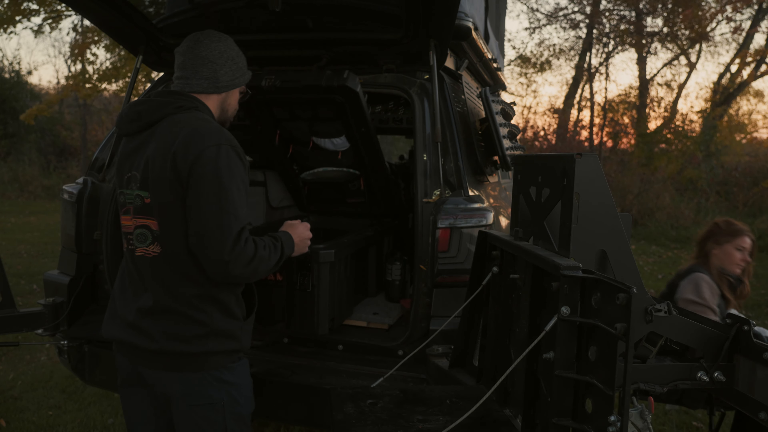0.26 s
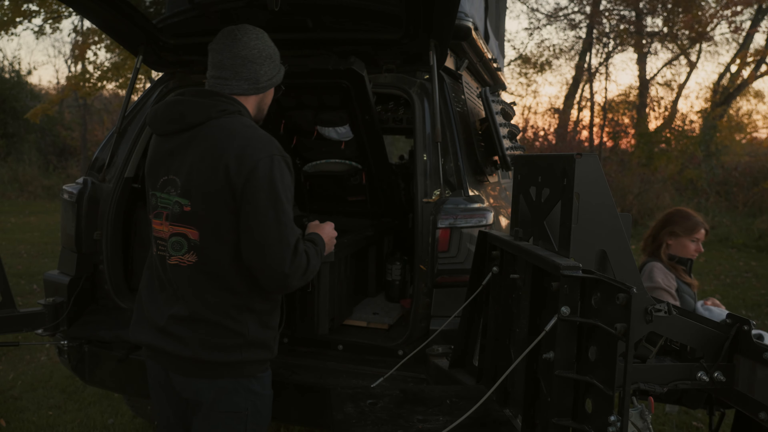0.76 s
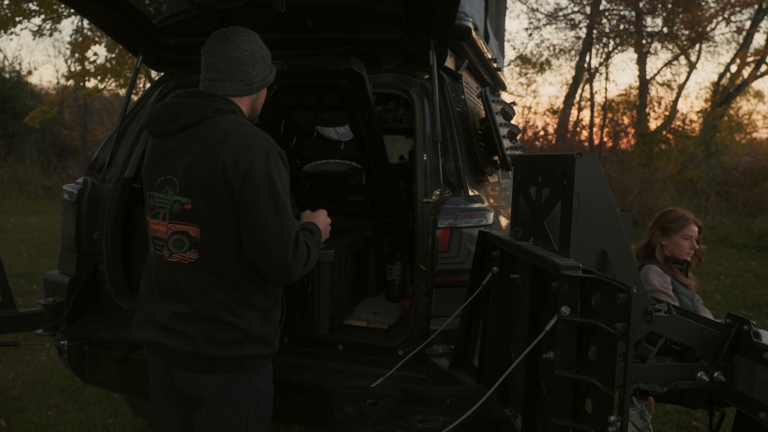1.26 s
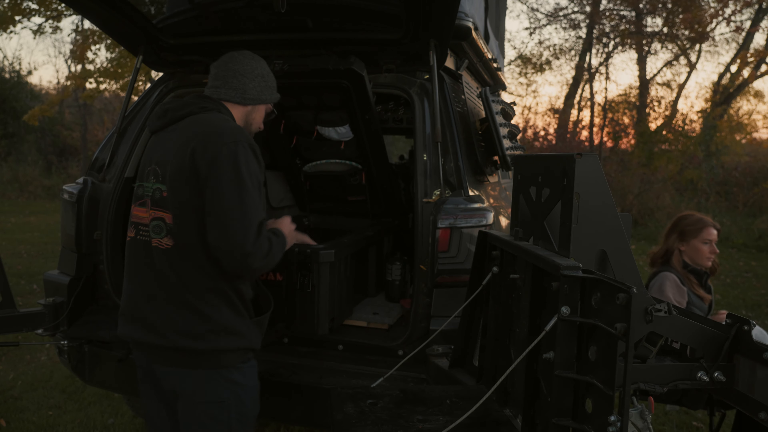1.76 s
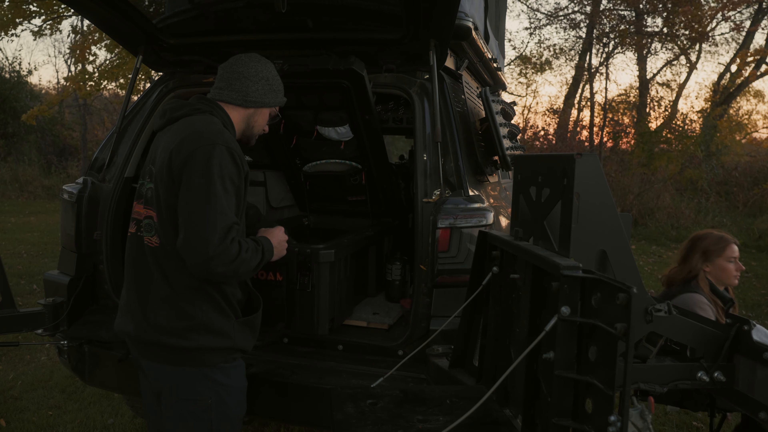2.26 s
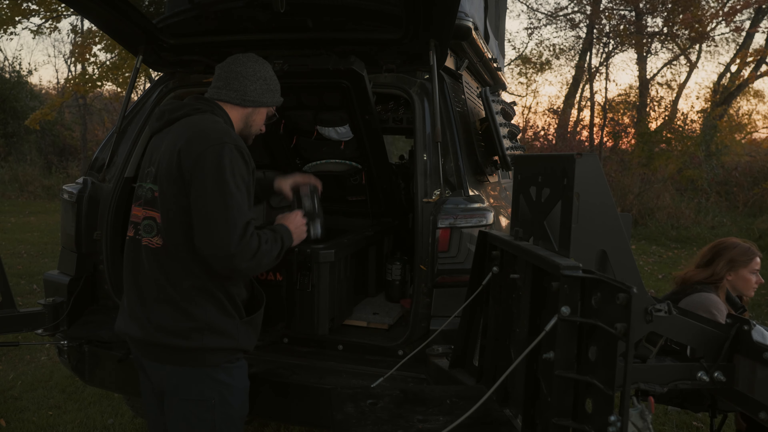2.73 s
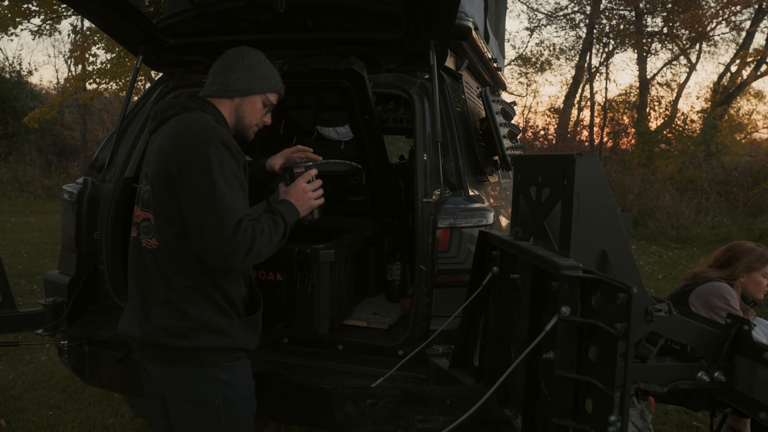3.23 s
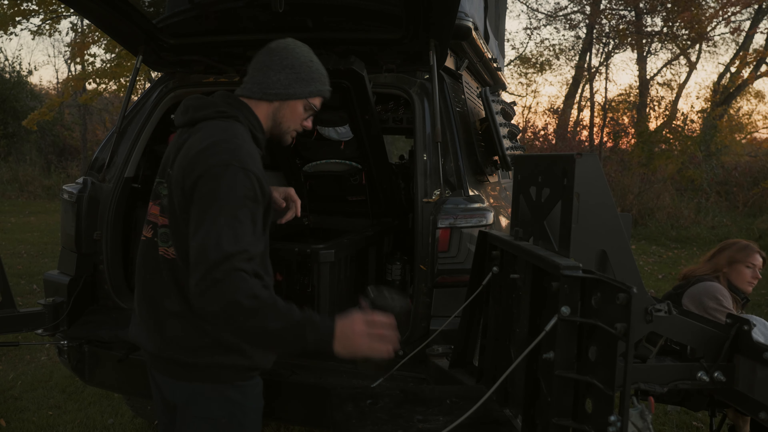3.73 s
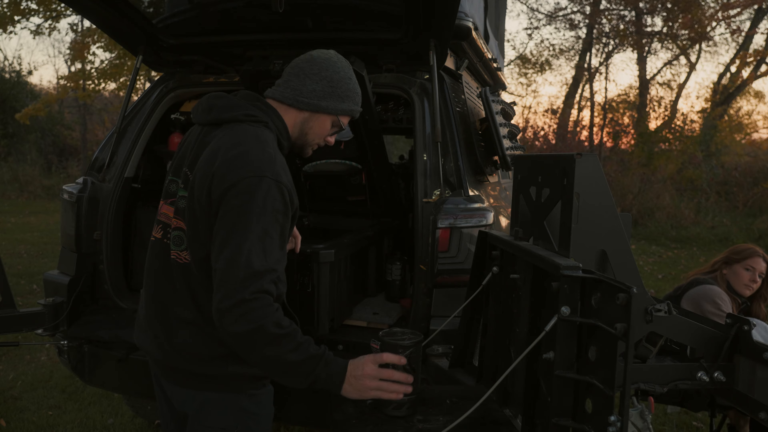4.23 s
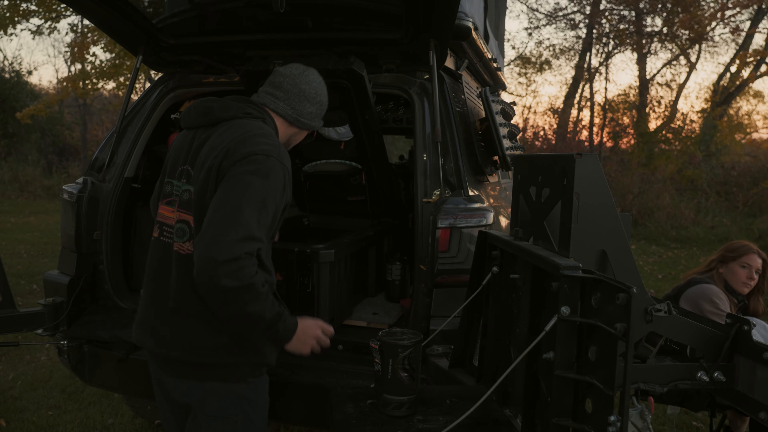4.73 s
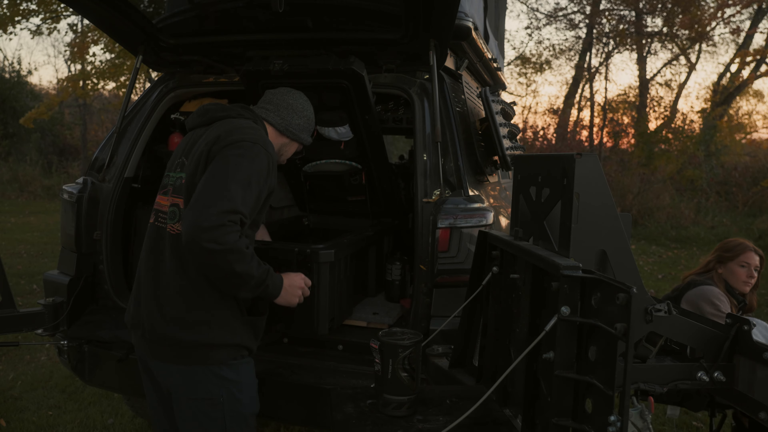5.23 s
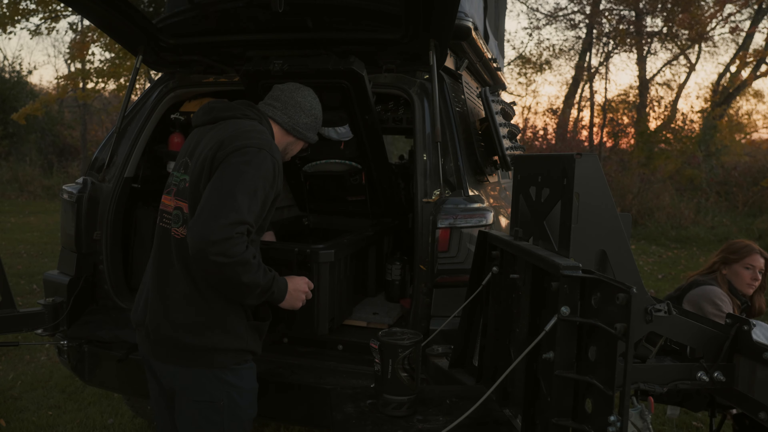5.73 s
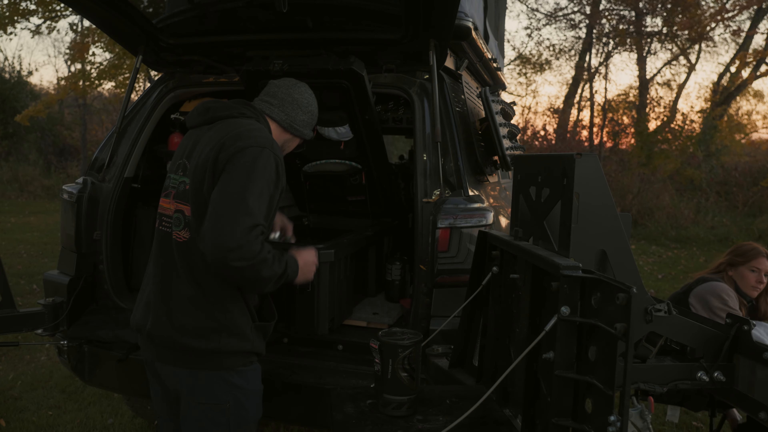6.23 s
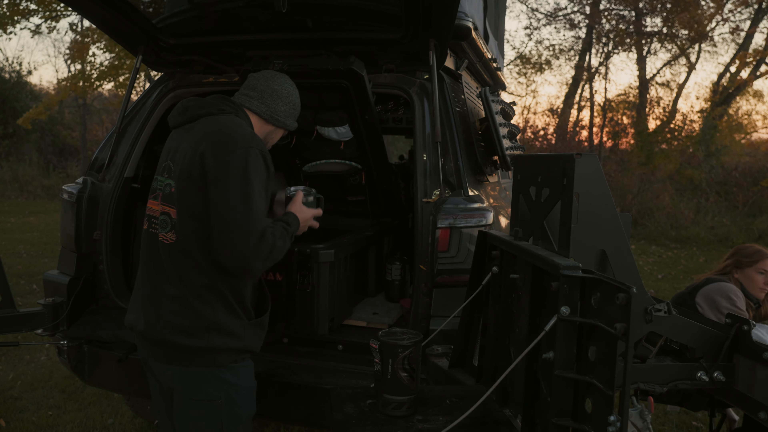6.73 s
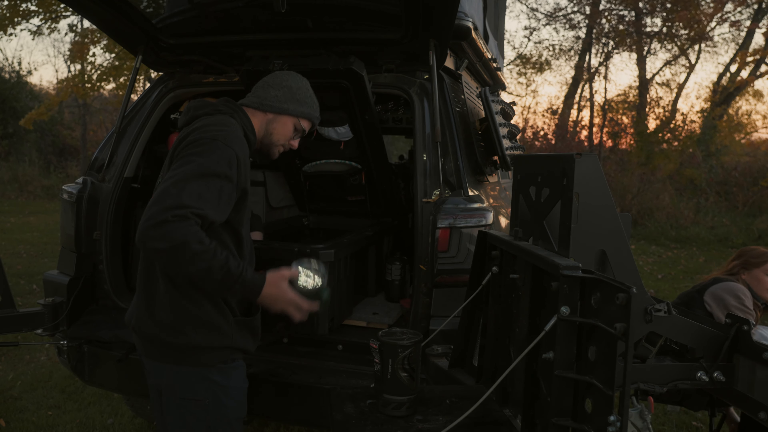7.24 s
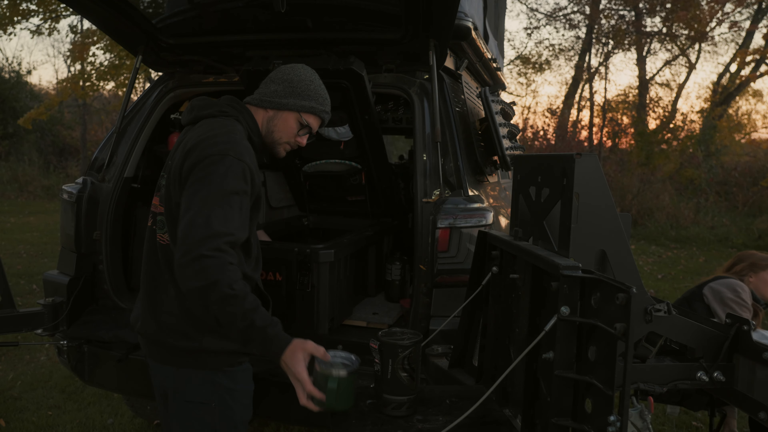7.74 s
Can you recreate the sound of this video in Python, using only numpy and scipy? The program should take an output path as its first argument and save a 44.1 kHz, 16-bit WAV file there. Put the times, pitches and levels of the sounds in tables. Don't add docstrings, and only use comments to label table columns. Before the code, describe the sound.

Hollow plastic thuds, small clicks and hand scuffs as someone unpacks metal camping gear onto a vehicle deck, with a quiet motor hum outdoors.

```python
import sys
import numpy as np
from scipy import signal
from scipy.io import wavfile
from scipy.ndimage import uniform_filter1d

SR = 44100
rng = np.random.default_rng(int(sys.argv[2]) if len(sys.argv) > 2 else 0)


def natural_amplitude(level_db):
    exponent = np.asarray(level_db, float) / 20
    return 10 ** exponent


def bounce(signal):
    frames = np.transpose(np.atleast_2d(signal))
    limited = np.clip(frames, -1, 1)
    pcm = np.round(limited * 32767).astype(np.int16)
    wavfile.write(sys.argv[1], SR, pcm)


N = 352359


def rms_one(x):
    return x / np.sqrt(np.mean(x ** 2) + 1e-20)


def peak_one(x):
    return x / np.max(np.abs(x))


def add(out, start_s, sound):
    i = round(start_s * SR)
    out[i:i + len(sound)] += sound[:N - i]


def band(x, low_hz, high_hz):
    edges = [low_hz, min(high_hz, .45 * SR)]
    return signal.sosfilt(signal.butter(2, edges, "band", fs=SR, output="sos"), x)


def resonance(x, hz, width_hz):
    r = np.exp(-np.pi * width_hz / SR)
    b = np.array([1, 0, -1]) * (1 - r * r) / 2
    return signal.lfilter(b, [1, -2 * r * np.cos(2 * np.pi * hz / SR), r * r], x)


def drift(rate):
    r = np.exp(-80 * np.pi * rate / SR)
    noise = rng.standard_normal(N // 40 + 2002)
    slow = signal.lfilter([1], [1, -2 * r, r * r], noise)[2000:]
    return np.interp(np.arange(N) / 40, np.arange(len(slow)), rms_one(slow))


def dying(t60, rise_s):
    t = np.arange(6000) / SR
    return t, (1 - np.exp(-t / rise_s)) * natural_amplitude(-60 * t / max(t60, .004))


def stroke(length_s, flat):
    return np.sin(np.linspace(0, np.pi, max(int(length_s * SR), 8))) ** flat


def struck(modes, hits):
    out, t = np.zeros(N), np.arange(SR // 2) / SR
    for (start_s, db), luck in zip(hits, rng.standard_normal((len(hits), 16))):
        rings = 0
        for (hz, level, t60), luck_db in zip(modes, luck):
            fall = natural_amplitude(level + luck_db - 60 * t / min(t60, .4))
            rings = rings + fall * np.sin(2 * np.pi * hz * t)
        add(out, start_s, natural_amplitude(db) * rings)
    return out


# (t/s, peak level/dB, wall f/Hz)
WALL_PUSHES = [(0.329, -48, 57.7), (0.473, -50.5, 60.3), (1.875, -45, 101), (1.9, -43, 102),
               (1.934, -29.5, 134), (1.981, -36.5, 112), (2.012, -39, 119), (2.104, -32, 137),
               (2.126, -21.5, 146.5), (2.151, -21.5, 135), (2.194, -34, 132), (2.233, -45, 106),
               (2.299, -33, 90), (2.329, -34, 84.4), (2.347, -19.5, 136), (2.394, -34.5, 129),
               (2.494, -26, 147), (2.529, -47, 173), (2.618, -40.5, 151), (2.676, -47, 102),
               (5.431, -40, 157), (5.49, -39.5, 124), (5.557, -45.5, 225), (5.621, -48, 122),
               (5.706, -42, 189), (5.8, -46, 114), (5.836, -35.5, 120), (5.897, -30, 144),
               (5.936, -39.5, 97), (5.989, -49, 115)]
# (t/s, peak level/dB, deck f/Hz, T60/s)
DECK_BOOMS = [(0.588, -41.5, 146, 0.09), (0.614, -40.5, 82, 0.074), (0.802, -44, 90, 0.058),
              (.853, -26.5, 204, 0.048), (0.867, -29.5, 92, 0.052), (0.899, -43.5, 66.6, 0.21),
              (4.048, -45, 94, 0.37), (4.048, -35, 250, 0.23), (4.077, -33.5, 234.7, 0.34),
              (4.122, -37, 224, 0.039), (4.139, -49.5, 78, .17), (4.249, -51.5, 77, 0.41),
              (6.092, -13.5, 207, 0.033), (6.097, -20.5, 80, 0.036), (6.107, -21, 160, 0.05),
              (6.107, -15.5, 204, 0.089), (6.139, -22, 133, 0.038), (6.178, -36, 112, 0.097),
              (6.199, -45, 61, 0.15), (6.425, -34.5, 116.5, 0.13), (6.654, -39.5, 219, 0.055),
              (6.735, -39.5, 264.6, 0.12), (7.024, -34.5, 187, 0.055), (7.046, -37, 211, 0.072),
              (7.069, -43, 118, 0.24), (7.157, -37, 134, 0.082), (7.193, -41.5, 92, 0.077),
              (7.716, -36.5, 413, 0.053), (7.954, -31, 99.7, 0.15), (6.832, -54, 93.5, 0.36),
              (.855, -37, 294, 0.093)]


def thumps():
    out = np.zeros(N)
    pushes = []
    for start_s, db, hz in WALL_PUSHES:
        t60 = 0.093 * natural_amplitude(-0.27 * -(-db - 40))
        pushes.append((start_s, db, hz, t60))
    pushes += DECK_BOOMS
    for (start_s, db, hz, t60), noise in zip(pushes, rng.standard_normal((len(pushes), 6000))):
        t, fall = dying(t60, rise_s=1.06 / hz)
        swing = np.sin(2 * np.pi * hz * t)
        neighbour = 0.35 * natural_amplitude(-150 * t) * np.sin(2 * np.pi * 1.561 * hz * t)
        rough = 0.21 * rms_one(band(noise, 0.83 * hz, 2.26 * hz))
        add(out, start_s, natural_amplitude(db) * peak_one(fall * (swing + neighbour + rough)))
    return out


# (f/Hz, width/Hz, level/dB)
WALL_MODES = [(503, 190, 4), (675, 89, 7), (710, 270, 5), (1000, 43, 6), (1125, 230, 9.5), (1210, 27, -27)]
# (t/s, peak level/dB, body f/Hz)
BIN_KNOCKS = [(1.931, -48, 620), (1.983, -36.5, 348), (2.004, -48, 1130), (2.023, -42.5, 390),
              (2.093, -40, 1040), (2.121, -21.5, 587), (2.14, -20, 410), (2.19, -42, 400),
              (2.292, -38.5, 370), (2.345, -26.5, 398), (2.367, -38.5, 330), (2.459, -42, 370),
              (2.474, -33.5, 520), (2.494, -40, 370), (2.519, -43, 1010), (2.541, -36, 704),
              (2.559, -45, 468), (2.612, -47, 593), (2.644, -39, 500), (2.689, -48.5, 354),
              (2.738, -50.5, 900)]
# (t/s, peak level/dB, body f/Hz, crack level/dB)
GEAR_KNOCKS = [(.241, -48.5, 735, -0.5), (0.626, -49, 900, 0), (.85, -33.5, 544, -1), (3.08, -53.5, 367, 0),
               (3.138, -44, 1240, -26), (3.158, -51.5, 1000, -3), (4.049, -29, 396, -10),
               (4.073, -37, 360, -17), (4.269, -43.5, 350, -32), (5.886, -48, 1210, -6),
               (6.09, -24, 565, -9), (6.106, -40, 340, 2), (6.133, -31.5, 362, -12), (6.436, -39, 398, -15),
               (6.645, -58, 805, -11), (7.022, -38, 560, -19), (7.03, -41, 340, -20),
               (7.187, -46, 1030, -9), (7.49, -51.5, 355, 1), (7.712, -35.5, 1170, -8.5),
               (7.949, -34.5, 510, -9)]


def knocks():
    out = np.zeros(N)
    hits = []
    for start_s, db, hz in BIN_KNOCKS:
        crack_db = -6.5 - 0.27 * (db + 40)
        hits.append((start_s, db, hz, 0.046, crack_db))
    hits += [(start_s, db, hz, 0.071, crack_db) for start_s, db, hz, crack_db in GEAR_KNOCKS]
    for (start_s, db, hz, t60, crack_db), noise in zip(hits, rng.standard_normal((len(hits), 6000))):
        t, fall = dying(t60, rise_s=0.00042)
        body = peak_one(resonance(resonance(noise * fall, hz, width_hz=0.3 * hz), hz, width_hz=hz))
        jolt = noise[::-1] * fall * natural_amplitude(-500 * t)
        walls = 0
        for (mode_hz, width_hz, level), luck in zip(WALL_MODES, noise[-8:]):
            walls = walls + natural_amplitude(level + 2.6 * luck) * resonance(jolt, mode_hz, width_hz)
        add(out, start_s, natural_amplitude(db) * (body + natural_amplitude(crack_db + 7.5) * peak_one(walls)))
    return signal.sosfilt(signal.butter(3, 1450, fs=SR, output="sos"), out)


# (t/s, peak level/dB, f/Hz, top end level/dB)
BIN_TICKS = [(1.934, -48, 3640, -14), (1.983, -49.5, 3300, -4), (2.0035, -40.5, 2230, -16),
             (2.0377, -47, 3340, -20), (2.078, -47.5, 3140, -20), (2.1035, -35, 3170, -14),
             (2.105, -39, 3100, -14), (2.12, -36, 2300, -20), (2.1314, -30, 3820, -11),
             (2.1368, -29.5, 1940, -22), (2.1642, -36, 3700, -24), (2.175, -27.5, 4570, -14),
             (2.199, -44, 3280, -14), (2.2194, -47.5, 3580, -20), (2.288, -48, 3000, -8),
             (2.2918, -42, 1790, -26), (2.3448, -38.5, 1980, -4.5), (2.404, -54, 3000, -14),
             (2.428, -43.5, 3260, -16), (2.4759, -32, 3170, -24), (2.521, -46, 3000, -17),
             (2.5429, -37.5, 2920, -14), (2.5581, -32.5, 3280, -11), (2.611, -41.5, 2880, -22),
             (2.6443, -36.5, 1720, -10), (2.647, -36.5, 3860, -12)]
# (t/s, peak level/dB, f/Hz, top end level/dB)
GEAR_TICKS = [(0.267, -51, 4220, -1), (.6226, -54, 1810, -26), (0.851, -42, 2400, -32),
              (0.921, -52.5, 1860, 2), (2.979, -49.5, 1410, -21), (3.076, -47, 2860, -11),
              (3.139, -29, 3340, -11), (3.1555, -47, 1670, -21), (3.592, -46.5, 2740, -24),
              (3.61, -53, 2750, -25), (3.628, -42, 2670, -25), (3.641, -47, 2820, -5),
              (4.0464, -35.5, 4550, -5), (4.0731, -34.5, 3680, -12), (4.184, -50, 2600, -17),
              (4.142, -39, 3460, -12), (4.158, -40, 2600, -4), (4.17, -39.5, 3650, -5),
              (4.4088, -48, 2440, -21), (6.0895, -32, 2280, -30), (6.104, -41, 2270, -26),
              (6.122, -50, 3600, -20), (6.137, -52, 3080, -25), (0.851, -54, 2900, -30),
              (6.438, -52, 3090, -4), (7.0219, -39.5, 1630, -27), (7.151, -49.5, 3950, -20),
              (7.193, -48, 3100, -22), (7.4904, -46, 1450, -23), (7.7125, -33.5, 4170, -6),
              (7.7136, -35, 3030, -11), (7.721, -51, 3100, -12), (7.9495, -45.5, 1530, -8)]


def ticks():
    out = np.zeros(N)
    hits = [(start_s, db, hz, 0.031, top_db) for start_s, db, hz, top_db in BIN_TICKS]
    hits += [(start_s, db, hz, 0.047, top_db) for start_s, db, hz, top_db in GEAR_TICKS]
    for (start_s, db, hz, t60, top_db), noise in zip(hits, rng.standard_normal((len(hits), 6000))):
        t, fall = dying(t60, rise_s=0.00012)
        ping = peak_one(resonance(noise * fall, hz, width_hz=0.041 * hz))
        low_hz, high_hz = max(0.5 * hz, 1200), 1.64 * hz + 1100
        broad = peak_one(band(band(noise[::-1] * fall, low_hz, high_hz), low_hz, high_hz))
        top = peak_one(band(noise * fall * natural_amplitude(-700 * t), 6000, 15000))
        add(out, start_s, natural_amplitude(db) * (peak_one(.55 * ping + broad) + natural_amplitude(top_db) * top))
    return out


# (f/Hz, level/dB, T60/s)
LID_MODES = [(350, -11.5, 0.12), (522, -6, 0.047), (668, 2.5, 0.043), (797, -18, .1), (1050, -14, .1),
             (1084, -3, 0.062), (1600, -19, 0.045), (2280, -26, .07), (2520, -23, 0.054), (2670, -22, .05),
             (3036, -20, .04), (3320, -24, .05), (4500, -39, .05)]
# (t/s, level/dB)
LID_HITS = [
    (6.0901, -22),
    (6.106, -34.5),
    (6.138, -46),
]


def lid():
    return struck(LID_MODES, LID_HITS)


# (f/Hz, level/dB, T60/s)
STOVE_MODES = [(360, 5.5, 0.12), (308, -7, 0.39), (152, -13, 0.39), (459, -12, 0.22), (846, -4.5, 0.42),
               (1556, -25, 0.5), (1230, -35, .3), (3494, -24, 0.3)]
# (t/s, level/dB)
STOVE_HITS = [
    (4.046, -34.5),
    (4.075, -34),
    (4.161, -50.5),
]
# (f/Hz, level/dB, T60/s)
FEET_MODES = [(1760, 2.5, 0.034), (2150, 0, 0.039), (2430, 0, 0.043), (2950, -2, .05), (3280, -6, .05),
              (3620, -9, 0.056)]
# (t/s, level/dB)
FEET_HITS = [
    (4.0457, -38),
]
# (f/Hz, level/dB, T60/s)
GRATE_MODES = [(2270, 0, .25), (2320, -1, .25)]
# (t/s, level/dB)
GRATE_HITS = [
    (4.075, -49),
    (4.121, -58),
]
# (f/Hz, level/dB, T60/s)
ARM_MODES = [(4310, 2, 0.023), (4700, -6, 0.03)]
# (t/s, level/dB)
ARM_HITS = [
    (4.075, -38.5),
    (4.121, -57),
    (4.14, -51),
    (4.16, -43),
    (4.171, -54),
    (4.183, -53),
]


def stove():
    shell, feet = struck(STOVE_MODES, STOVE_HITS), struck(FEET_MODES, FEET_HITS)
    return shell + feet + struck(GRATE_MODES, GRATE_HITS) + struck(ARM_MODES, ARM_HITS)


# (f/Hz, level/dB, T60/s)
CANISTER_MODES = [(1211, 0, .21), (5500, -30, .35), (7680, -24, .25), (8436, -35, .4), (12680, -33, .12),
                  (13870, -30, .1)]
# (t/s, level/dB)
CANISTER_HITS = [
    (7.493, -56),
    (7.7127, -46),
    (7.718, -34.5),
]


def canister():
    return struck(CANISTER_MODES, CANISTER_HITS)


# (f/Hz, level/dB, T60/s)
CAP_MODES = [(4310, 0, 0.022), (3370, -5.5, 0.023)]
# (t/s, level/dB)
CAP_HITS = [
    (7.7128, -30.5),
    (7.7148, -32.5),
    (7.733, -53),
]


def canister_cap():
    return struck(CAP_MODES, CAP_HITS)


# (t/s, peak level/dB)
CATCH_SNAPS = [
    (2.175, -48),
    (3.141, -29.5),
    (3.15, -38),
    (3.292, -49),
    (7.7118, -22),
]


def snaps():
    out = np.zeros(N)
    for (start_s, db), noise in zip(CATCH_SNAPS, rng.standard_normal((len(CATCH_SNAPS), 6000))):
        t, fall = dying(0.0087, rise_s=0.00025)
        add(out, start_s, natural_amplitude(db) * peak_one(band(noise * fall, 9100, 14000)))
    return out


# (f/Hz, level/dB, T60/s)
LATCH_MODES = [(10930, 0, 0.09)]
# (t/s, level/dB)
LATCH_HITS = [
    (2.133, -56),
    (2.176, -47.5),
    (2.31, -69),
    (3.641, -54),
]


def latch():
    return struck(LATCH_MODES, LATCH_HITS)


# (t/s, length/s, hiss level/dB, scrape level/dB, bin shake level/dB)
SLIDES = [(0.219, 0.11, -59, -58.5, -62), (0.85, 0.13, -66.5, -66, -54.5), (1.84, 0.23, -68, -65, -61.5),
          (2.062, 0.18, -61.5, -57, -42), (2.203, 0.69, -62.5, -62.5, -63), (2.447, 0.29, -77, -85, -59),
          (2.854, 0.051, -64, -72, -83), (3.03, 0.12, -57.5, -61.5, -67), (3.109, 0.073, -51.5, -54, -64),
          (3.22, 0.13, -66, -66, -69), (4.027, 0.23, -70, -62, -49), (4.35, 0.15, -63, -66.5, -74),
          (5.298, 0.43, -67, -62, -58.5), (5.671, 0.049, -58, -66, -64), (5.778, 0.11, -57.5, -60.5, -61),
          (5.842, 0.13, -63.5, -58, -55), (5.935, 0.26, -65, -65, -71), (6.615, 0.093, -61.5, -63.5, -75),
          (6.703, 0.09, -61.5, -67, -76), (7.015, 0.058, -60.5, -56.5, -39.5), (7.09, 0.12, -68, -73, -56),
          (7.185, 0.44, -67, -70, -63), (7.51, 0.13, -67.5, -71, -73), (7.708, 0.044, -60, -78, -47)]


def slides():
    crackle = 1 + 3 * (rng.random(N) < 400 / SR) * rng.random(N)
    grain = rng.standard_normal((2, N)) * crackle * natural_amplitude(2.2 * drift(70) + 1.4 * drift(18))
    edges = np.geomspace(1700, 16500, 11)
    parts = []
    for k, (low_hz, high_hz) in enumerate(zip(edges, edges[1:])):
        parts.append(rms_one(band(grain[k % 2], low_hz, high_hz)) * natural_amplitude(1.8 * drift(19)))
    hiss = rms_one(sum(natural_amplitude(0.56 * k) * part for k, part in enumerate(parts[5:])))
    scrape = rms_one(sum(natural_amplitude(1.4 * k) * part for k, part in enumerate(parts[:5])))
    shake = rms_one(band(grain[1], 70, 593))
    gains = np.zeros((3, N))
    for start_s, length_s, *dbs in SLIDES:
        shape = stroke(length_s, flat=0.87)
        shape = shape * natural_amplitude(np.linspace(0, -4, len(shape)))
        for gain, db in zip(gains, dbs):
            add(gain, start_s, natural_amplitude(db) * shape)
    return hiss * gains[0] + scrape * gains[1] + shake * gains[2]


# (t/s, length/s, f/Hz, rms level/dB, width/Hz)
SQUEAKS = [(.216, 0.031, 12590, -38, 15), (0.24, 0.023, 12800, -58, 200), (0.23, 0.053, 8350, -59, 310),
           (0.235, .036, 4350, -57, 110), (0.866, 0.016, 4950, -54.5, 72), (0.942, .02, 5050, -61, 60),
           (.622, 0.011, 1800, -51, 150), (5.662, 0.08, 3500, -62, 60), (5.817, 0.015, 3050, -60, 80),
           (5.986, .015, 1600, -58.5, 60), (6.021, 0.049, 1110, -57, 54), (4.389, 0.047, 2270, -62, 79),
           (5.8, 0.07, 4100, -64, 50), (6.622, 0.11, 3750, -61.5, 30), (6.631, 0.047, 810, -59, 40),
           (7.228, .055, 4400, -66, 25), (7.32, .03, 8450, -66, 40), (7.368, .025, 8400, -65, 40)]


def squeaks():
    out = np.zeros(N)
    noises = rng.standard_normal((len(SQUEAKS), 8000))
    for (start_s, length_s, hz, db, width_hz), noise in zip(SQUEAKS, noises):
        shape = stroke(length_s, flat=1.56)
        wander = rms_one(uniform_filter1d(noise, size=90))[:len(shape)]
        pitch_hz = hz * np.linspace(1.006, .994, len(shape)) + width_hz * wander
        tone = np.sqrt(2) * np.sin(2 * np.pi * np.cumsum(pitch_hz) / SR)
        flutter = natural_amplitude(width_hz / 60 * wander[::-1])
        add(out, start_s, natural_amplitude(db) * shape * flutter * tone)
    return out


# (f/Hz, width/Hz, level/dB)
RUBBED_MODES = [(4420, 160, -1.5), (6900, 70, -3.5), (8550, 78, 0), (10000, 100, -9), (10450, 72, -2),
                (11200, 90, 1), (13500, 98, -2), (14900, 300, -0.5)]
# (t/s, length/s, level/dB)
CANISTER_RUBS = [
    (5.67, .05, -60),
    (5.778, .085, -58),
    (7.226, .28, -60.5),
]


def canister_rub():
    gain, noise = np.zeros(N), rng.standard_normal(N)
    for start_s, length_s, db in CANISTER_RUBS:
        shape = stroke(length_s, flat=0.11)
        fade = natural_amplitude(db - 30 * np.arange(len(shape)) / SR)
        add(gain, start_s, fade * shape)
    lit = 0
    for hz, width_hz, level in RUBBED_MODES:
        lit = lit + natural_amplitude(level + 4.5 * drift(25)) * resonance(noise, hz, 2.4 * width_hz)
    return natural_amplitude(1.5) * gain * rms_one(lit)


def cabin(x):
    t60_s, level_db = 0.15, -20
    t = np.arange(SR // 3) / SR
    tail = band(rng.standard_normal(len(t)), 49, 2060) * natural_amplitude(-60 * t / t60_s) * (t > .004)
    return natural_amplitude(level_db) * signal.fftconvolve(x, tail / np.sqrt(np.sum(tail ** 2)))[:N]


# (f/Hz, rms level/dB, width/Hz, steady share 0-1)
MOTOR_TONES = [(102, -68, 35, 0.46), (231.7, -61.5, 3.6, 0.9), (355, -70.5, 7.8, 0.25),
               (468, -79, 2.5, 0.99), (542, -72, 5.3, 0.66), (1155, -75, 63, 0.34)]


def hum():
    out, t = 0, np.arange(N) / SR
    for hz, db, width_hz, steady in MOTOR_TONES:
        loose = rms_one(resonance(rng.standard_normal(N), hz, width_hz))
        sine = np.sqrt(2) * np.sin(2 * np.pi * hz * t)
        out = out + natural_amplitude(db) * (steady * sine + (1 - steady) * loose)
    return out


# (f/Hz, level/dB per Hz)
AIR_SPECTRUM = [(25, -4.5), (50, -11.5), (92, -8.5), (150, -11), (200, -10.5), (280, -16), (360, -15),
                (500, -22.5), (760, -24), (1100, -26), (1700, -30.5), (5200, -31.5), (7500, -38),
                (16000, -45)]


def air():
    out, white = 0, rng.standard_normal((2, N))
    edges = 22 * 2 ** np.arange(0, 9.7, 1 / 3)
    hz, db = np.transpose(AIR_SPECTRUM)
    for k, (low_hz, high_hz) in enumerate(zip(edges, edges[1:])):
        level = np.interp(np.log(low_hz * high_hz) / 2, np.log(hz), db)
        out = out + natural_amplitude(level + 0.89 * drift(3.4)) * band(white[k % 2], low_hz, high_hz)
    return natural_amplitude(-58.5) * rms_one(out)


def scene():
    blows = thumps() + knocks() + ticks() + lid() + stove() + canister() + snaps()
    close = canister_cap() + latch() + slides() + squeaks() + canister_rub()
    return (blows + cabin(blows) + close + hum() + air())[None]


def top_cut(x):
    return signal.sosfilt(signal.butter(12, 15830, fs=SR, output="sos"), x)


def record(dry):
    heard = signal.sosfilt(signal.butter(3, 47.3, "high", fs=SR, output="sos"), dry)
    return top_cut(heard)


dry = scene()
out = record(dry)
bounce(out)
```